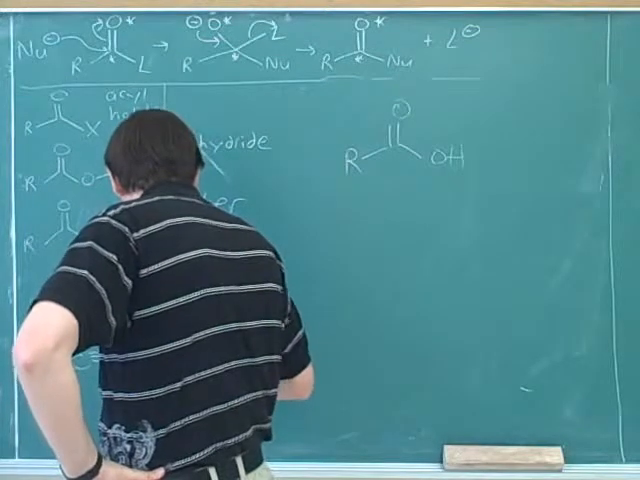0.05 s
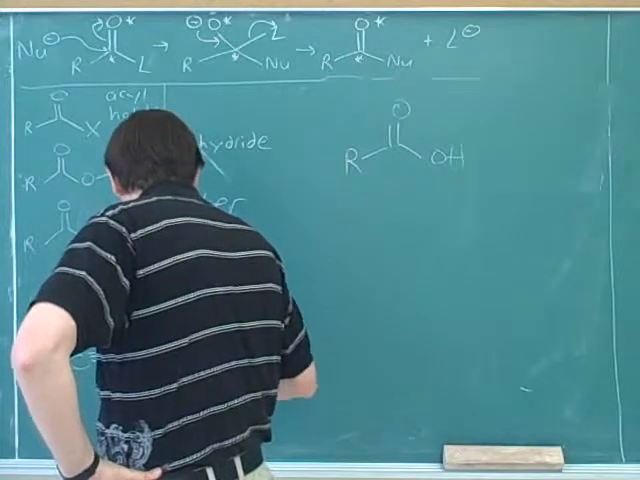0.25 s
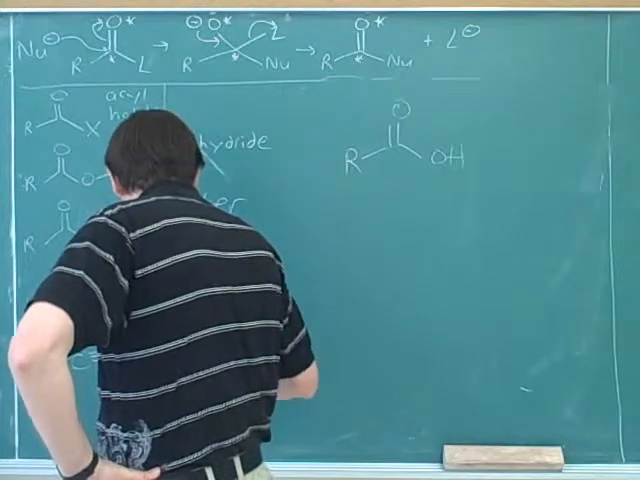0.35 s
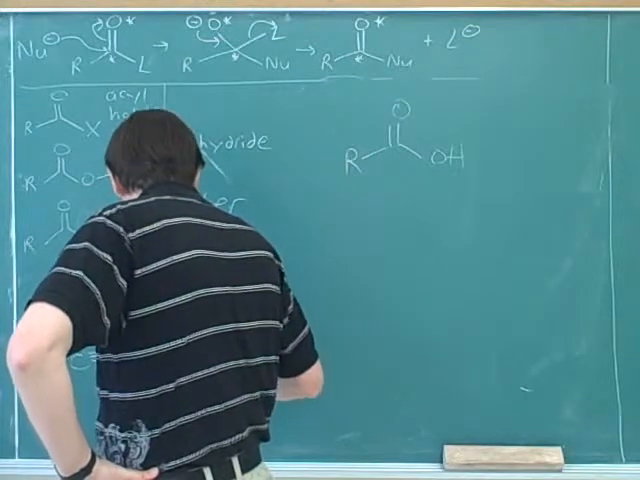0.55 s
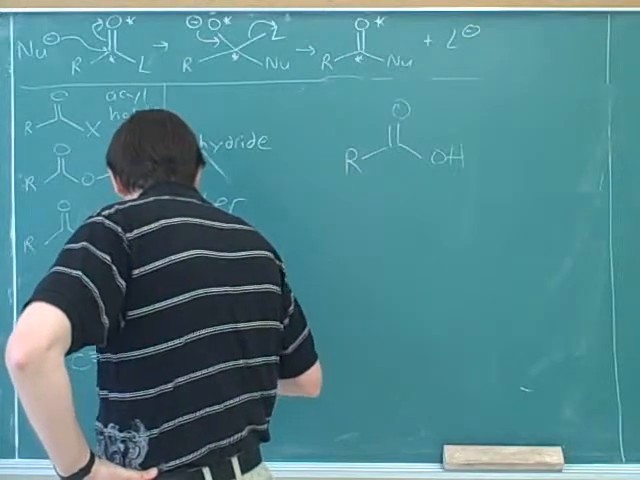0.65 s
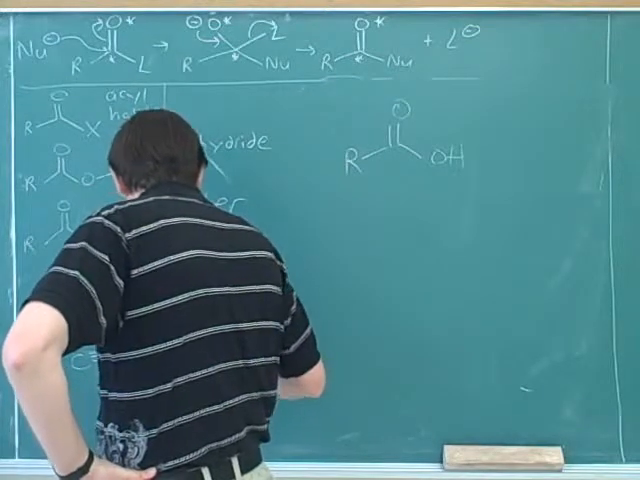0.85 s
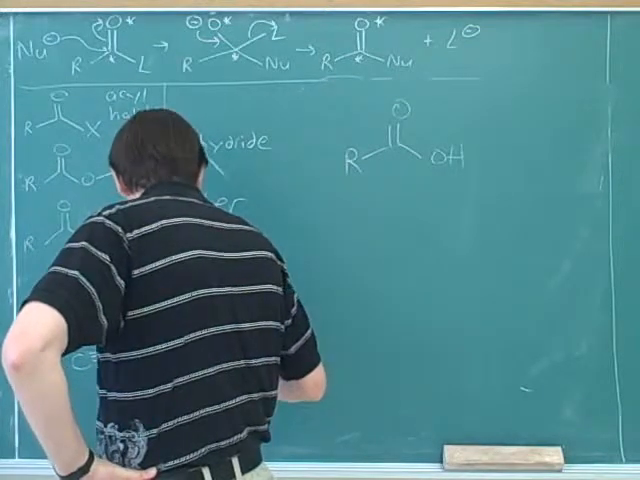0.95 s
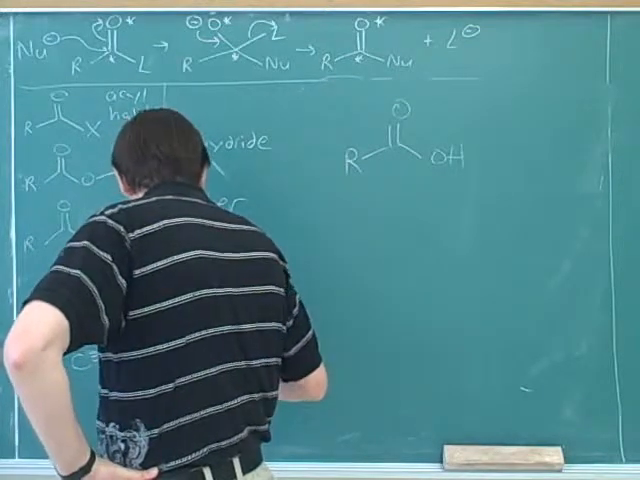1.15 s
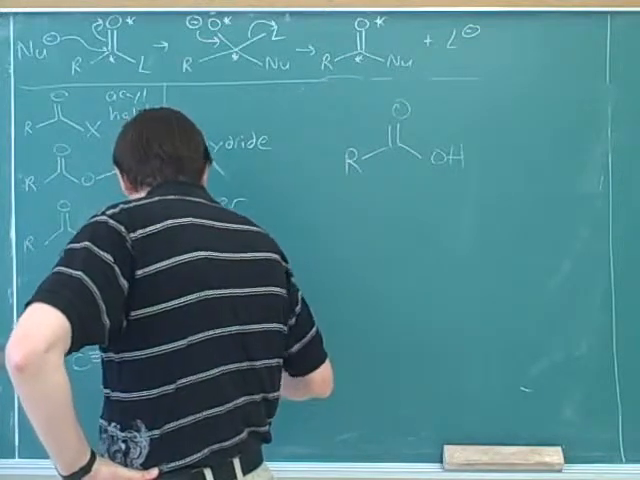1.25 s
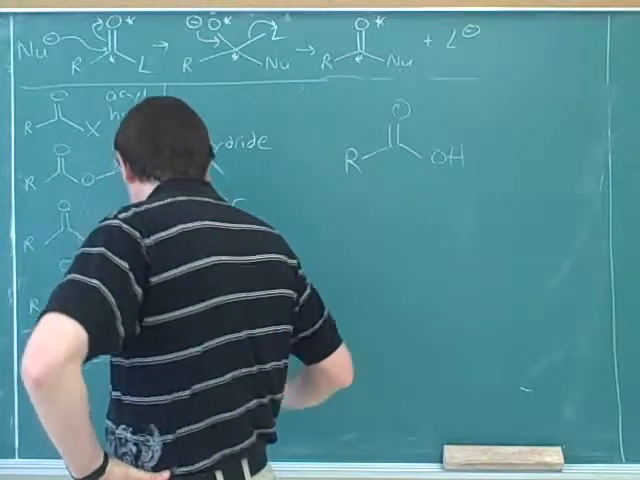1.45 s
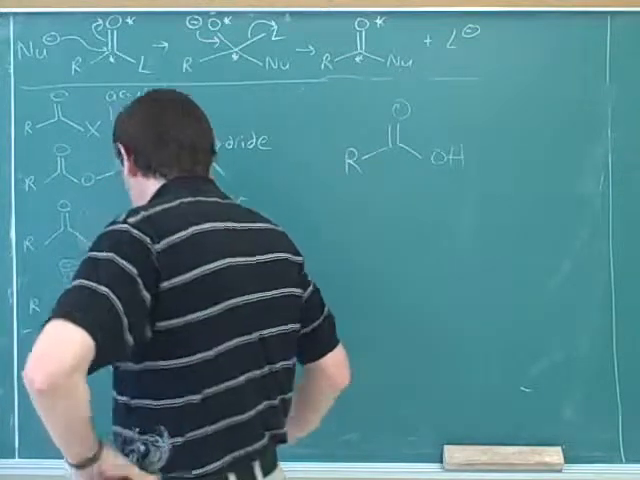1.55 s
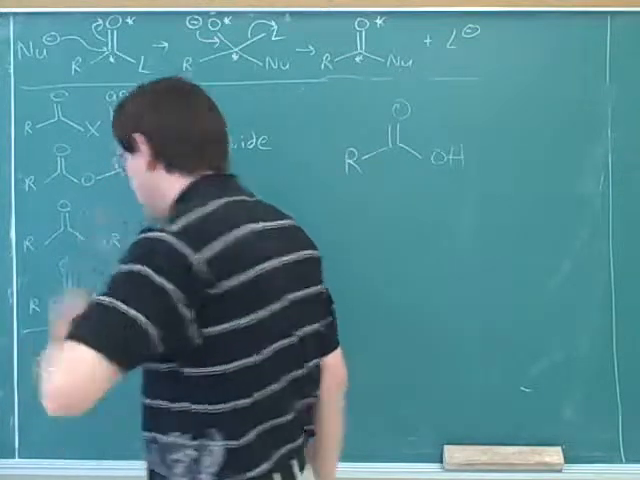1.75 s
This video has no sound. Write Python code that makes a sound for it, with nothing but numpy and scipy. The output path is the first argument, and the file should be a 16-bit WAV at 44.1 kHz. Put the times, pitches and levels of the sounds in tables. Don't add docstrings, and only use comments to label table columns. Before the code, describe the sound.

Chalk taps sharply on a slate board six times, with faint scratches, in an echoing classroom

```python
import sys
import numpy as np
from scipy import signal
from scipy.fft import rfft, irfft
from scipy.io import wavfile
from scipy.ndimage import uniform_filter1d

SR = 44100
rng = np.random.default_rng(int(sys.argv[2]) if len(sys.argv) > 2 else 0)


def attenuation_scalar(level_db):
    decades = np.asarray(level_db, float) / 20
    return 10 ** decades


def dump(signal):
    limited = np.clip(np.atleast_2d(signal).T, -1, 1)
    pcm = np.round(limited * 32767).astype(np.int16)
    wavfile.write(sys.argv[1], SR, pcm)


N = 79380
LEAD = 8820
TILT_PIVOT_HZ = 1700


def evened(x):
    return x / np.sqrt(np.mean(x ** 2) + 1e-20)


def read(points, hz):
    f, value = np.transpose(points)
    return np.interp(np.log(hz + 1), np.log(f + 1), value)


def colour(x, points):
    hz = np.fft.rfftfreq(len(x), 1 / SR)
    return irfft(rfft(x) * attenuation_scalar(read(points, hz)), len(x))


def add(mix, start_s, sound):
    part = mix[round(start_s * SR) + LEAD:][:len(sound)]
    part += sound[:len(part)]


# (frequency [Hz], density [dB per Hz])
AIR_SPECTRUM = [(20, -3.5), (50, -3.5), (130, -2), (300, -14), (600, -25), (1100, -28), (2500, -37),
                (16000, -46)]
AIR_DB, AIR_PATCH_DB = -47.5, 0.73


def air():
    hz = np.fft.rfftfreq(1024, 1 / SR)
    real, imag, patches = rng.standard_normal((N // 256 + 5, 513, 3)).T
    patches = uniform_filter1d(patches, size=8, axis=0)
    patches = evened(uniform_filter1d(patches, size=10, axis=1))
    level_db = read(AIR_SPECTRUM, hz)[:, None] + AIR_PATCH_DB * patches
    noise = signal.istft((real + 1j * imag) * attenuation_scalar(level_db), nperseg=1024, noverlap=768)[1]
    return attenuation_scalar(AIR_DB) * evened(noise[:N])


# (frequency [Hz], t60 [s])
ROOM_T60 = [(150, 1), (500, 1), (1200, 0.45), (2500, 0.44), (5000, 0.54), (9000, 0.33), (15000, 0.22)]
# (frequency [Hz], level [dB])
ROOM_COLOUR = [(400, 3.5), (650, -4), (1150, 3), (1620, -0.5), (2450, 3), (4500, -3.5), (8000, -3),
               (15000, 1.5)]
ROOM_DB, ROOM_BUILD_S = 4.5, 0.0029
EARLY_DB, EARLY_S = 5, 0.013
BACK_WALL_S, BACK_WALL_DB, BACK_WALL_SPREAD_S = 0.0505, 2, 0.0083


def room_tail():
    arrivals = np.zeros(SR)
    at = np.arange(0, SR - 12, 12) + rng.integers(0, 12, (SR - 1) // 12)
    arrivals[at] = rng.choice([-1., 1.], len(at))
    hz, frame_s, z = signal.stft(arrivals, SR, nperseg=256)
    decay_db = -60 * frame_s / read(ROOM_T60, hz)[:, None]
    z = z * attenuation_scalar(read(ROOM_COLOUR, hz)[:, None] + decay_db)
    tail = signal.istft(z, SR, nperseg=256)[1][:SR]
    t = np.arange(SR) / SR
    build = 1 - np.exp(-(t / ROOM_BUILD_S) ** 2)
    back_wall_db = BACK_WALL_DB * np.exp(-((t - BACK_WALL_S) / BACK_WALL_SPREAD_S) ** 2)
    early_db = EARLY_DB * np.exp(-(t / EARLY_S) ** 2)
    tail = tail * build * attenuation_scalar(back_wall_db + early_db)
    return attenuation_scalar(ROOM_DB) * tail / np.linalg.norm(tail)


# (delay [s], gain [dB], sign [+1 or -1])
NEAR = [(.0015, -8, 1), (.0030, -9, 1), (.0057, -3, 1), (.0072, -9, 1), (.0093, -4, -1), (.0125, -10, 1),
        (.0165, -10, 1)]


def classroom(direct, spread):
    near = np.zeros(1000)
    for delay_s, gain_db, sign in NEAR:
        near[round(delay_s * SR)] = sign * attenuation_scalar(gain_db)
    near = np.convolve(near, [.25, .5, .25])
    echoes = signal.fftconvolve(direct, near)[:len(direct)]
    late = signal.fftconvolve(spread, room_tail())[:len(direct)]
    return direct + echoes + late


WALL_HZ = (26.1, 38.9, 53, 75.6)
THUMP_RISE_S, THUMP_DB = 0.037, -24.5


def thump(level_db):
    t = np.arange(9000) / SR
    swell = (t / THUMP_RISE_S) ** 2 * np.exp(2 - 2 * t / THUMP_RISE_S)
    swing = sum(np.sin(2 * np.pi * (hz * t + rng.random())) for hz in WALL_HZ)
    return attenuation_scalar(level_db) * swell * swing


# (start [s], length [s], level [dB])
STROKES = [
    (-.05, 0.12, -64.5),
    (0.243, 0.094, -61.5),
    (0.443, 0.12, -64.5),
    (0.52, 0.16, -68.5),
    (.83, 0.075, -63),
    (0.99, 0.24, -72),
    (1.144, 0.092, -68),
    (1.395, 0.079, -67),
    (1.47, 0.14, -66.5),
]
# (frequency [Hz], level [dB])
STROKE_COLOUR = [(500, 11.5), (2000, 1), (5000, 1), (9000, 4.5), (15000, -2)]
GRAINS_PER_S, GRAIN_SPREAD_DB = 9000, 1.5


def strokes():
    t = (np.arange(N + LEAD) - LEAD) / SR
    press = np.zeros(len(t))
    for start_s, length_s, level_db in STROKES:
        progress = np.clip((t - start_s) / length_s, 0, 1)
        press += attenuation_scalar(level_db) * np.sin(np.pi * progress) ** 0.45
    slips = rng.random(len(t)) < GRAINS_PER_S / SR
    strength = attenuation_scalar(GRAIN_SPREAD_DB * rng.exponential(1, len(t)))
    grains = slips * strength * rng.standard_normal(len(t))
    return press * evened(colour(grains, STROKE_COLOUR))


BLUR_HZ, WIDE_BLUR_HZ, WIDE_FROM_HZ = 220, 1500, 3000


def scattered(sound, tilt_db):
    hz = np.fft.rfftfreq(len(sound), 1 / SR)
    power = abs(rfft(sound)) ** 2
    fine = uniform_filter1d(power, size=int(BLUR_HZ / hz[1]))
    wide = uniform_filter1d(power, size=int(WIDE_BLUR_HZ / hz[1]))
    share = np.clip(hz / WIDE_FROM_HZ - 1, 0, 1)
    lean = attenuation_scalar(tilt_db * np.log2(np.clip(hz, 300, 5000) / TILT_PIVOT_HZ))
    pulse = irfft(np.sqrt(abs(fine + share * (wide - fine))) * lean, len(sound))
    return np.roll(pulse, 150)[:300] * np.hanning(300)


# (frequency [Hz], level [dB])
CRUMBLE = [(2000, 5), (4000, 0), (6000, 1), (7800, -3.5), (9500, -11), (12000, -13), (15000, -15.5)]
CRUMBLE_DELAY_S, CRUMBLE_RISE_T60_S, CRUMBLE_T60_S, TICK_DB = 0.0025, 0.011, 0.013, -17


def crumble(level_db):
    t = np.arange(3000) / SR
    late = t - CRUMBLE_DELAY_S
    spray = evened(colour(rng.standard_normal(len(t)), CRUMBLE))
    fall_db = 60 * np.maximum(late / CRUMBLE_T60_S, -late / CRUMBLE_RISE_T60_S)
    spray = spray * attenuation_scalar(level_db - fall_db)
    spray[4] += attenuation_scalar(level_db + TICK_DB)
    return spray


# (frequency [Hz], level [dB], t60 [s])
SLATE = [(405, -23.5, 0.015), (694, -39, 0.018), (960, -28, 0.054), (1223, -17, 0.018), (1410, -28, 0.019),
         (2134, -18, 0.023), (2380, -14, 0.038), (2740, -21, 0.024), (3550, -18.5, 0.024),
         (4470, -10, 0.012)]
SPOT_DB, SPOT_DETUNE = 1.2, 0.008


def tap(peak_db, contact_ms, crumble_db, tilt_db):
    t = np.arange(3000) / SR
    contact = np.arange(60) / SR / (max(contact_ms, .1) / 1000)
    blow = np.sin(np.pi * np.minimum(contact, 1)) ** 2
    ring = np.zeros(len(t))
    for hz, level_db, t60_s in SLATE:
        spot_level, spot_pitch = rng.standard_normal(2)
        mode_db = level_db + SPOT_DB * spot_level + tilt_db * np.log2(hz / TILT_PIVOT_HZ)
        mode_hz = hz * (1 + SPOT_DETUNE * spot_pitch)
        ring += attenuation_scalar(mode_db - 60 * t / t60_s) * np.sin(2 * np.pi * mode_hz * t)
    out = np.convolve(ring, blow / blow.sum())[:len(t)]
    out[:len(blow)] += blow
    return attenuation_scalar(peak_db) * (out + crumble(crumble_db))


# (time [s], peak [dB], contact [ms], crumble [dB], tilt [dB per octave])
TAPS = [
    (0.2053, -15, 0.13, -5.5, 2),
    (.4126, -20.5, 0.37, -11.5, 0.2),
    (0.7635, -38.5, 0.3, -19, -4),
    (0.7708, -40.5, 0.23, -17, -7.5),
    (.7840, -17.5, 0.41, -12, 2.1),
    (0.959, -16, 0.31, -15, 0.9),
    (1.1163, -18.5, 0.4, -16.5, 0.8),
    (1.3313, -16, 0.29, -11, 1.5),
]
# (peak [dB], contact [ms], crumble [dB], tilt [dB per octave])
EARLIER_TAP = (-20, -0.24, -22, -3.1)
EARLIER_S = -0.12


def scene():
    direct, wall = strokes(), np.zeros(N + LEAD)
    spread = direct.copy()
    for start_s, peak_db, *touch in [(EARLIER_S, *EARLIER_TAP)] + list(TAPS):
        sound = tap(peak_db, *touch)
        add(direct, start_s, sound)
        add(spread, start_s, scattered(sound, touch[-1]))
        add(wall, start_s, thump(peak_db + THUMP_DB))
    low_cut = signal.butter(N=1, Wn=480, btype="high", fs=SR)
    chalk = signal.lfilter(*low_cut, classroom(direct, spread))
    return ((chalk + wall)[LEAD:] + air())[None]


def top_cut(x):
    return signal.sosfilt(signal.butter(12, 16630, fs=SR, output="sos"), x)


def record(dry):
    edge = signal.firwin(255, 15900, window=("kaiser", 6), fs=SR)
    mix = signal.oaconvolve(dry, edge[None], "same")
    return top_cut(mix)


dry = scene()
out = record(dry)
dump(out)
```